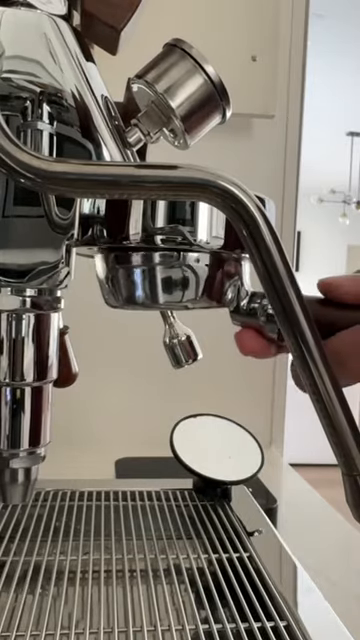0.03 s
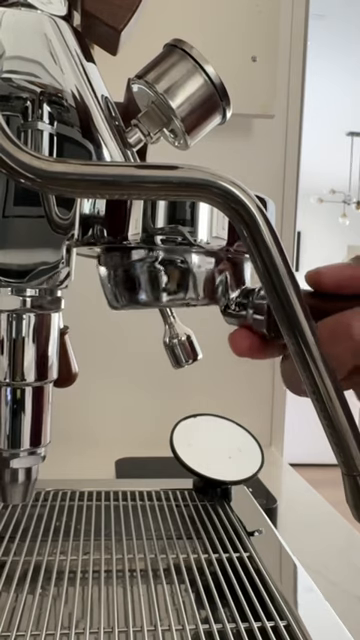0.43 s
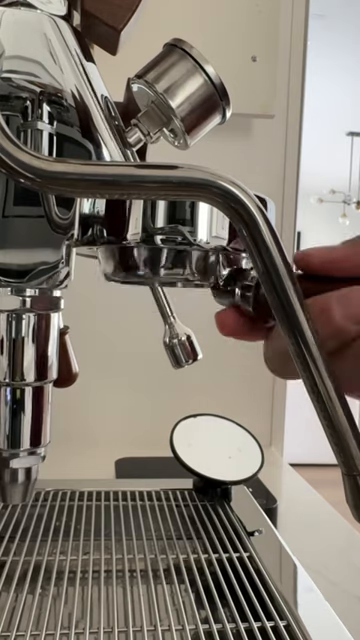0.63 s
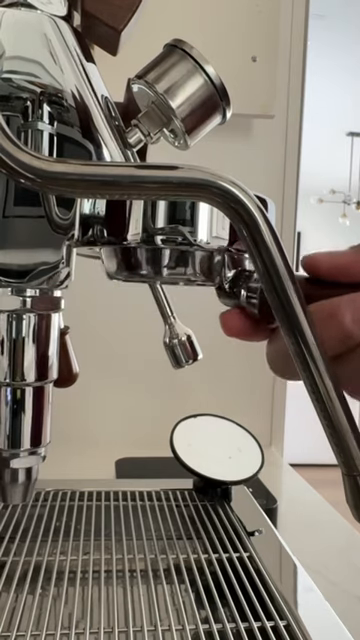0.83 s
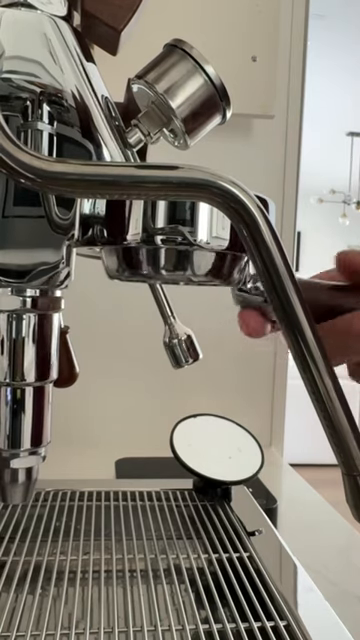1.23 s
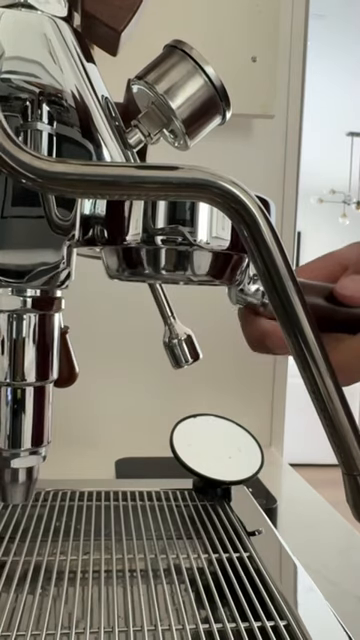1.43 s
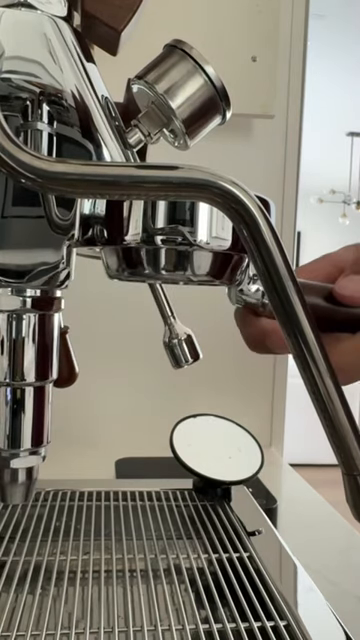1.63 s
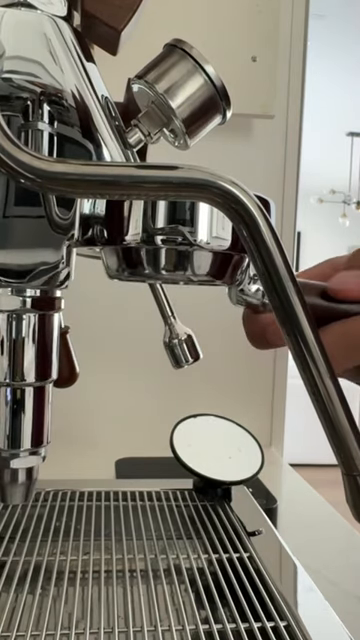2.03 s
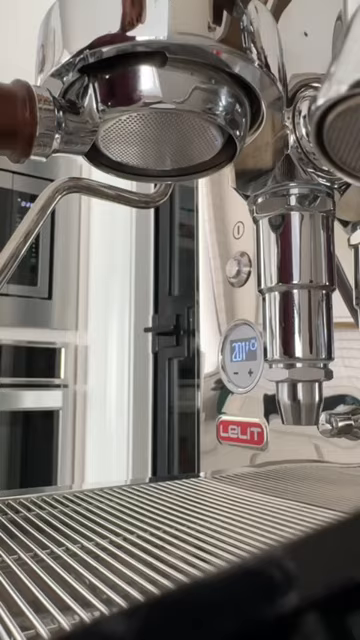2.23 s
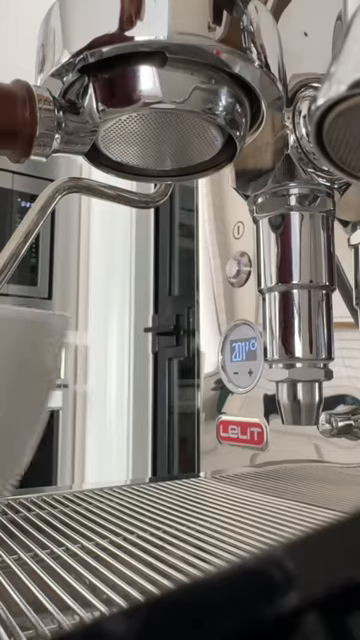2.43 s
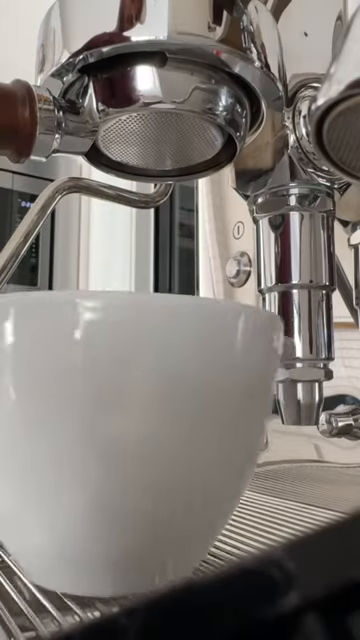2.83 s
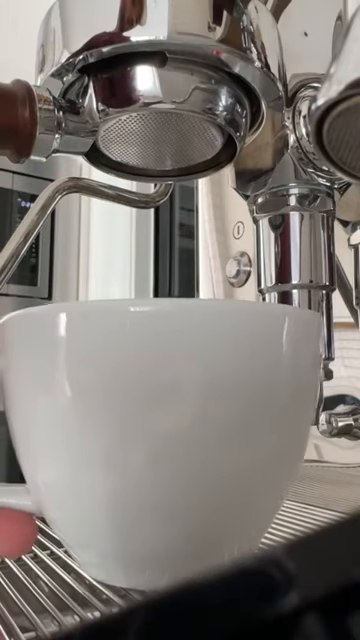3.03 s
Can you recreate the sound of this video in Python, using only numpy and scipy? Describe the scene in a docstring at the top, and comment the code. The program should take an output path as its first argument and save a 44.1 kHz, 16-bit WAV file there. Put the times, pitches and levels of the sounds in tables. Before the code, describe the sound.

A steel portafilter clanks into an espresso machine at about 0.2 seconds, with a louder cluster around 0.5. Softer knocks and faint rubbing follow until 1.5 as it tightens, then a light tick near 1.9. At 2.3 a china cup knocks onto the wire drip tray, scrapes and judders across it, and clinks down at 2.9 over a faint boiler hum. A low rumble underlies the small kitchen.

```python
"""In a small kitchen, over a low rumble, a steel portafilter clanks into the group head of an espresso
machine and is twisted tight against its gasket. The impacts excite the steel's modes and shake the frame.
Then, with the boiler singing faintly in narrow resonances, a china cup knocks onto the wire drip tray,
scrapes across it by stick-slip friction and is set down. Reflections and a diffuse tail follow the blows."""
import sys
import numpy as np
from scipy import signal
from scipy.fft import rfft, irfft
from scipy.io import wavfile

SR = 44100
rng = np.random.default_rng(int(sys.argv[2]) if len(sys.argv) > 2 else 0)


def generate_wav(sig):
    """Save sig (samples, or channels by samples) to the path in sys.argv[1] as 16-bit PCM at SR."""
    pcm = np.round(np.clip(np.atleast_2d(sig).T, -1, 1) * 32767).astype(np.int16)
    wavfile.write(sys.argv[1], SR, pcm)


N = 141120
TIME = np.arange(N) / SR
FREQS = np.maximum(np.fft.rfftfreq(N, 1 / SR), 1)


def from_db(db):
    """Amplitude ratio: tenfold for every 20 dB."""
    return 10 ** (np.asarray(db) / 20)


def rms_one(x):
    """Normalisation to unit rms."""
    return x / np.sqrt(np.mean(x ** 2) + 1e-20)


def level(rows, column=1):
    """Amplitude envelope, interpolated in decibels over time."""
    rows = np.array(rows)
    return from_db(np.interp(TIME, rows[:, 0], rows[:, column]))


def at_hz(points, hz=FREQS):
    """Interpolation on a logarithmic frequency axis."""
    points = np.array(points)
    return np.interp(np.log(hz), np.log(points[:, 0]), points[:, 1])


def uneven(along, spacing):
    """Random fluctuation of spread about 1, with a new value at every spacing."""
    knots = rng.standard_normal(4000)
    return np.interp(along / spacing, np.arange(len(knots)), knots) * np.sqrt(1.5)


def coloured(db, source=None):
    """Spectral shaping of white noise, or of a given source, to unit rms."""
    source = rng.standard_normal(N) if source is None else source
    return rms_one(irfft(rfft(source) * from_db(db), N))


def decay(start, t60, rise):
    """Damping: after its rise, the envelope falls 60 dB in t60 seconds."""
    age = np.maximum(TIME - start, 0)
    return (1 - np.exp(-age / rise)) * np.exp(-np.minimum(np.log(1000) * age / t60, 50))


def ring(x, hz, t60):
    """Damped oscillator: a unit impulse starts a decaying sine of amplitude 1."""
    radius = np.exp(-np.log(1000) / (t60 * SR))
    angle = 2 * np.pi * hz / SR
    return signal.lfilter([0, np.sin(angle)], [1, -2 * radius * np.cos(angle), radius ** 2], x + 1e-18)


def clatter(blows, colour_db, pivot_hz):
    """Modal overlap: each blow is a burst of decaying noise with its own level, brightness and length."""
    octaves = np.log2(np.maximum(FREQS, 200) / pivot_hz)
    return sum(from_db(db) * coloured(colour_db + tilt * octaves) * decay(start, t60, rise=.0006)
               for start, db, tilt, t60, *_ in blows)


def slips(per_s=6000, spread_db=2.5):
    """Stick-slip friction: a random train of tiny impulses of uneven size."""
    sizes = from_db(spread_db * np.minimum(rng.exponential(1, N), 4)) * rng.choice([-1, 1], N)
    return sizes * (rng.random(N) < per_s / SR)


# Envelope of the rumble (time [s], level [dB])
RUMBLE_LEVEL = [(0, -60.5), (.4, -48), (.7, -49), (.9, -62.5), (1.2, -58.5), (1.42, -53.5), (1.65, -69.5),
                (2.1, -69.5), (2.2, -58), (2.55, -63), (2.68, -54), (2.85, -50), (3.2, -59)]
# Its spectrum (frequency [Hz], relative level [dB])
RUMBLE_SPECTRUM = [(30, -17), (50, -5.5), (75, 3.5), (120, -2.5), (200, -14), (400, -19), (1000, -30),
                   (3000, -38), (10000, -53.5)]
def background(hiss_db=-99):
    """Ambient noise: a low rumble swells and fades over faint white hiss."""
    rumble = level(RUMBLE_LEVEL) * coloured(at_hz(RUMBLE_SPECTRUM))
    return rumble + from_db(hiss_db) * rng.standard_normal(N)


# Control points of the decay curve, read at octave centres (frequency [Hz], T60 [s])
ROOM_T60 = [(80, 0.424), (400, 0.9649), (1200, -0.0561), (3000, 0.7643), (9000, 0.0473)]
# Spectra of the early reflections and of the tail (frequency [Hz], gain [dB])
EARLY_SPECTRUM = [(200, -10), (450, -9), (1000, -1.5), (2500, -2.5), (5000, -3.5), (9500, -4)]
TAIL_SPECTRUM = [(60, -1), (300, 0.5), (400, 4), (750, 3.5), (1400, 6), (2100, -3), (2650, -9.5),
                 (3300, -3), (5000, -0.5), (9500, -5.5)]
def kitchen(direct, early_db, tail_db, rise_s=.008):
    """Reverberation: close reflections from machine and wall, and a tail dying octave by octave."""
    white, tail = rfft(rng.standard_normal(N)), 0
    for hz in 80 * 2.0 ** np.arange(8):
        band = np.clip(1 - np.abs(np.log2(FREQS / hz)), 0, 1)
        tail = tail + irfft(white * band, N) * decay(0, at_hz(ROOM_T60, hz), rise_s)
    early = rng.standard_normal(N) * decay(0, t60=.17, rise=rise_s)
    transfer = rfft(rms_one(early)) * from_db(early_db + at_hz(EARLY_SPECTRUM))
    transfer += rfft(rms_one(tail)) * from_db(tail_db + at_hz(TAIL_SPECTRUM))
    response = irfft(transfer, N)[:N // 2] / np.sqrt(N)
    return direct + signal.fftconvolve(direct, response)[:N]


# Resonances of the machine (frequency [Hz], bandwidth [Hz], level [dB])
SINGING_MODES = [(355.5, 18, -59), (995.6, 30, -65), (1795, 50, -68), (2212.9, 17, -52.5),
                 (2537, 60, -65.5)]
# Spectrum of the simmer (frequency [Hz], relative level [dB])
SIMMER_SPECTRUM = [(40, -29.5), (120, -6.5), (330, -5.5), (600, -10), (1400, -25), (2200, -11), (3000, -24),
                   (5500, -30.5), (9500, -45), (13000, -62.5)]
def boiler(start_s=2.147, simmer_db=-60.5):
    """Noise-driven resonance: a faint simmer sings in a few narrow bands."""
    song = sum(from_db(db) * rms_one(ring(rng.standard_normal(N), hz, np.log(1000) / (np.pi * width)))
               for hz, width, db in SINGING_MODES)
    simmer = from_db(simmer_db) * coloured(at_hz(SIMMER_SPECTRUM))
    return (song + simmer) * (TIME > start_s)


# Envelope of the rubbing (time [s], level [dB])
TWIST_LEVEL = [(0, -71.5), (.9, -65), (.98, -60), (1.08, -57.5), (1.17, -69), (1.3, -67), (1.5, -99),
               (2.14, -100)]
# Its spectrum (frequency [Hz], relative level [dB])
GASKET_SPECTRUM = [(300, 0.5), (1000, -2.5), (2400, 0.5), (4000, -8), (7500, -1.5), (9500, -11.5),
                   (13000, -50.5)]
def gasket():
    """Stick-slip friction: the gasket rubs as the handle turns."""
    return level(TWIST_LEVEL) * coloured(at_hz(GASKET_SPECTRUM), slips())


# Light contacts (time [s], level [dB], tilt [dB/octave], T60 [s])
HANDLE_TICKS = [(1.156, -51.5, -3.5, .13), (1.847, -50, -1, 0.026), (1.8655, -34.5, 1.5, 0.0241)]
# Their spectrum (frequency [Hz], relative level [dB])
TICK_SPECTRUM = [(300, -38), (1100, -20.5), (2500, -10.5), (4800, -10), (6000, -2), (6900, -2.5), (7700, 1),
                 (9000, 1), (10000, -8), (13000, -52.5)]
def handle():
    """Impact transients: light, bright ticks as the hand eases off the handle."""
    return clatter(HANDLE_TICKS, at_hz(TICK_SPECTRUM), pivot_hz=6000)


# Thuds in the housing (time [s], level [dB], centre frequency [Hz], rise [s], T60 [s])
FRAME_THUDS = [(.213, -28, 240.9, .01, 0.14), (0.201, -37.5, 94.7, 0.014, 0.335),
               (0.421, -34.5, 128.4, 0.013, 0.75), (.492, -23, 90.4, 0.0204, 0.3),
               (.505, -28.5, 400, 0.011, .16), (.885, -45.5, 282, 0.015, 0.243),
               (.962, -44, 84.5, 0.0129, 0.416), (1.266, -37.5, 480.2, 0.00288, 0.13),
               (1.37, -42, 259, .03, 0.243), (1.41, -45.5, 85, .015, 0.17),
               (1.432, -48, 477, 0.0038, 0.089)]
def frame(width_octaves=.6, skirt_db=18):
    """Damped structural vibration: the shaken housing thuds in broad, low bands of noise."""
    out = 0
    for start, db, hz, rise, t60 in FRAME_THUDS:
        detuning = np.sqrt(1 + (np.log2(FREQS / hz) / width_octaves) ** 2)
        out = out + from_db(db) * coloured(-skirt_db * detuning) * decay(start, t60, rise)
    return out


# Modes of cup and tray, weighted by the point of contact
# (frequency [Hz], T60 [s], landing level [dB], relative sliding level [dB], settling level [dB])
TRAY_MODES = [(449.7, 0.333, -22.5, -52, -38), (590.27, 0.171, -24, -48, -35.5), (819, .2, -42, -57, -30.5),
              (1018.1, .25, -28, -50, -47), (1077, 0.0985, -34.5, -60, -14.5),
              (1164.2, 0.123, -19.5, -57.5, -27.5), (1301.2, .12, -23, -56, -30.5),
              (1657, .16, -27.5, -53, -56), (1760.4, 0.17, -19.5, -48.5, -39),
              (1845.4, 0.145, -26, -54.5, -20), (2283, 0.34, -34, -40, -38.5),
              (2517, 0.13, -32.5, -41.5, -28.5), (2890, .2, -28.5, -55, -30.5),
              (4650, .11, -41, -54.5, -32), (6050, .15, -43, -52.5, -37.5), (6325, .18, -37.5, -57, -41),
              (6773, .1, -50.5, -54, -30.5), (9740, 0.155, -44.5, -58.5, -35.5)]
def tray_modes(friction, land_s=2.3372, settle_s=2.8925):
    """Free and forced vibration: the modes ring after two impacts and are driven by slips between."""
    rubbing = slips() * friction
    mean_effort = np.sqrt(np.mean(friction ** 2)) / level(SLIDE_LEVEL).max()
    out = 0
    for k, (hz, t60, land_db, slide_db, settle_db) in enumerate(TRAY_MODES):
        impulses = np.zeros(N)
        impulses[[int(land_s * SR), int(settle_s * SR)]] = from_db([land_db, settle_db])
        struck = (-1) ** k * ring(impulses, hz, t60)
        rubbed = from_db(slide_db) * mean_effort * rms_one(ring(rubbing, hz, t60))
        out = out + struck + rubbed
    return out


# Envelope of the judder (time [s], level [dB])
JUDDER_LEVEL = [(2.336, -48.5), (2.355, -31.5), (2.4, -30), (2.48, -55.5), (2.59, -56), (2.635, -42.5),
                (2.665, -29), (2.705, -29.5), (2.77, -41.5), (2.86, -56.5), (2.95, -100)]
def tray_judder(hz=219.19):
    """Fundamental mode: the tray judders as the cup lands and again at full sliding speed."""
    return level(JUDDER_LEVEL) * np.sin(2 * np.pi * hz * TIME) * (TIME > JUDDER_LEVEL[0][0])


# Impacts of cup on tray (time [s], level [dB], tilt [dB/octave], T60 [s])
CUP_KNOCKS = [(2.3368, -12.5, -1, 0.0242), (2.35, -21, -0.5, 0.091), (2.359, -22, -0.5, 0.105),
              (2.389, -25.5, -3, 0.288), (2.891, -18.5, 2, .07), (2.903, -18, -1.5, 0.0913),
              (2.928, -29, 1, 0.0523)]
# Envelopes of the slide (time [s], friction level [dB], grit level [dB])
SLIDE_LEVEL = [(2.33, -130, -130), (2.35, -43, -41.5), (2.4, -39.5, -40.5), (2.48, -46, -52),
               (2.51, -42, -44.5), (2.555, -41.5, -36), (2.59, -39, -39.5), (2.66, -34.5, -33),
               (2.71, -39.5, -42.5), (2.81, -36.5, -40.5), (2.88, -41.5, -55), (2.94, -48.5, -67.5),
               (3.02, -81.5, -100)]
# Spectra of the knocks, the scrape and its treble grit (frequency [Hz], relative level [dB])
CHINA_SPECTRUM = [(30, -31), (70, -14), (280, -13.5), (560, -1.5), (880, -10), (1200, 2), (1550, -5.5),
                  (1900, 0), (2900, -4.5), (3400, -14), (4100, -16), (4800, -10.5), (6400, -14),
                  (9500, -23.5), (13000, -57)]
SCRAPE_SPECTRUM = [(30, -27.5), (100, -8), (290, -19), (600, -1.5), (880, -12), (1100, -7.5), (1450, -8),
                   (1800, 2), (2450, 7.5), (2900, -4.5), (4200, -21), (10000, -35)]
GRIT_SPECTRUM = [(1000, -19.5), (3200, -6), (3900, -2.5), (4300, -10), (4750, 0.5), (5300, -2), (6100, 2.5),
                 (8000, -1), (9500, -8.5), (13000, -54)]
def cup(ripple_db=3.5, ripple_spacing_hz=110, catch_db=2.5, catches_per_s=140):
    """Impact and sliding friction: the cup lands, catches unevenly on the wires and settles."""
    # The grille's many close resonances ripple the spectrum.
    wires_db = ripple_db * uneven(FREQS, ripple_spacing_hz) * np.clip(FREQS / 3000, 0, 1)
    catching = from_db(catch_db * uneven(TIME, 1 / catches_per_s))
    friction = level(SLIDE_LEVEL) * catching
    ringing = tray_modes(friction)
    knocks = clatter(CUP_KNOCKS, at_hz(CHINA_SPECTRUM) + wires_db, pivot_hz=1500)
    scrape = friction * coloured(at_hz(SCRAPE_SPECTRUM) + wires_db, slips())
    grit = level(SLIDE_LEVEL, column=2) * catching * coloured(at_hz(GRIT_SPECTRUM) + wires_db, slips())
    return knocks + ringing + scrape + grit + tray_judder()


# Steel clanks, with a faint rush of noise leading into the first loud one
# (time [s], level [dB], tilt [dB/octave], T60 [s], modal gain [dB])
CLANKS = [(0.1263, -39.5, -4, 0.0363, 2.5), (.166, -43, -2.5, 0.29, -3.5), (.177, -14, 1.5, 0.0328, -1.5),
          (.183, -21.5, -1, 0.058, -0.5), (.2025, -21.5, -3.5, 0.0614, -2), (.396, -47, -4.5, 0.24, -5),
          (.422, -15, 4.5, 0.0379, -6), (.447, -19, 2, 0.032, 0), (.4605, -16, 2, 0.052, -6),
          (.4697, -11, 1, 0.0435, 2), (.477, -19, -1.5, .035, -0.5), (.4922, -13, -1.5, 0.045, -6.5),
          (.507, -23, -3, .08, -4.5), (.8805, -34, -3.5, 0.0494, 5), (.957, -29, -2.5, 0.0295, 2)]
# Spectrum of the dense ringing (frequency [Hz], relative level [dB])
STEEL_SPECTRUM = [(30, -35.5), (100, -13), (400, -3.5), (850, -2), (1500, -4), (2500, 3), (3300, -4),
                  (4300, 1), (5200, -6), (6100, -3), (8300, -6.5), (10000, -23.5), (13000, -51)]
# Modes of portafilter and group head (frequency [Hz], relative level [dB], T60 [s])
STEEL_MODES = [(267.26, -24, .24), (375.4, -29.5, 0.26), (591.6, -33, .4), (817.85, -22, 0.15),
               (853, -35, 0.69), (1251.1, -22.5, 0.19), (1757.4, -27.5, 0.14), (1860.6, -31, .3),
               (2089, -23, .12), (2339, -15, .08), (2507, -21.5, .13), (2656, -7.5, 0.077),
               (3959.3, -20, 0.07), (4370, -22, .09), (5855, -23.5, 0.14)]
def portafilter(spread_db=2):
    """Modal superposition: lugs hit the group head, each blow exciting each mode by its own amount."""
    starts, blow_db, _, _, ring_db = np.transpose(CLANKS)
    out = clatter(CLANKS, at_hz(STEEL_SPECTRUM), pivot_hz=2500)
    scatter_db = spread_db * rng.standard_normal((len(starts), len(STEEL_MODES)))
    for k, (hz, mode_db, t60) in enumerate(STEEL_MODES):
        impulses = np.zeros(N)
        impulses[(starts * SR).astype(int)] = from_db(blow_db + ring_db + mode_db + scatter_db[:, k])
        out = out + (-1) ** k * ring(impulses, hz, t60)
    return out


def scene():
    """Superposition: portafilter, then cup, add to the kitchen's rumble in one channel."""
    mix = gasket() + background()
    mix += kitchen(handle(), early_db=-11, tail_db=-18.5)
    mix += kitchen(portafilter(), early_db=-8, tail_db=-16) + frame()
    mix += kitchen(cup(), early_db=-10.5, tail_db=-23) + boiler()
    return mix[None]


def record(dry, low_cut_hz=42, high_cut_hz=10000):
    """Band limiting: the microphone loses the deepest bass, and the top is cut steeply."""
    highpass = signal.butter(2, low_cut_hz, "high", fs=SR, output="sos")
    lowpass = signal.ellip(10, .2, 70, high_cut_hz, fs=SR, output="sos")
    return signal.sosfilt(lowpass, signal.sosfilt(highpass, dry))


dry = scene()
out = record(dry)
generate_wav(out)
```